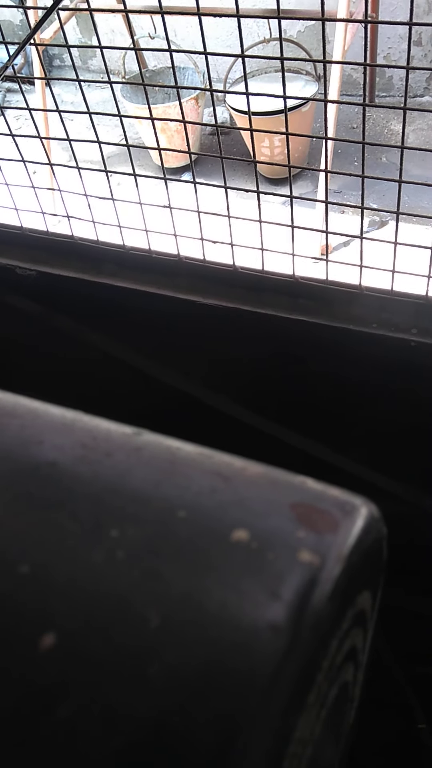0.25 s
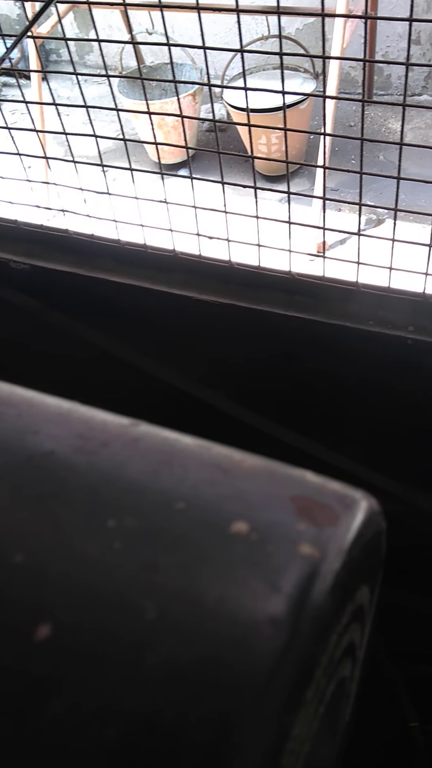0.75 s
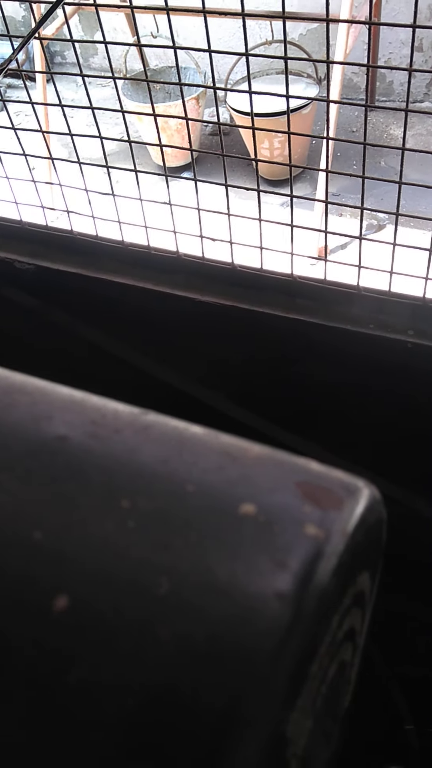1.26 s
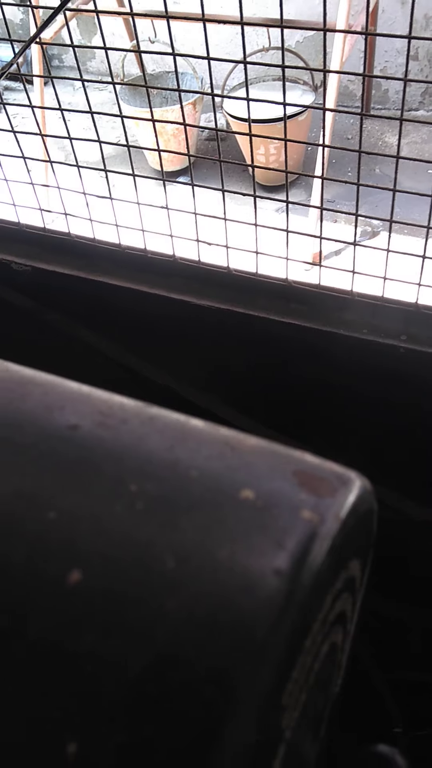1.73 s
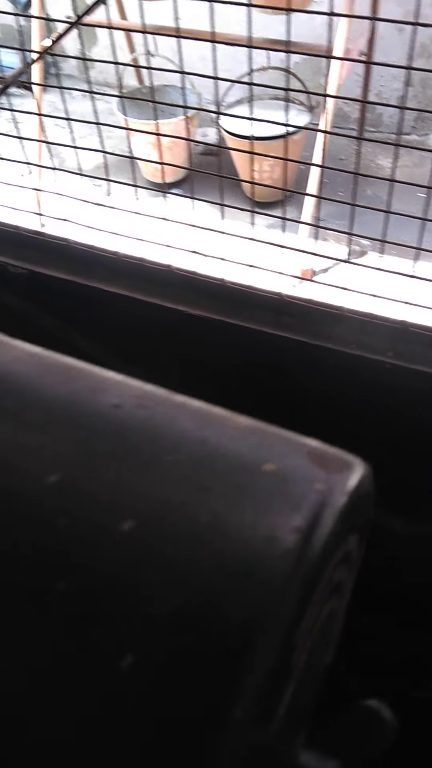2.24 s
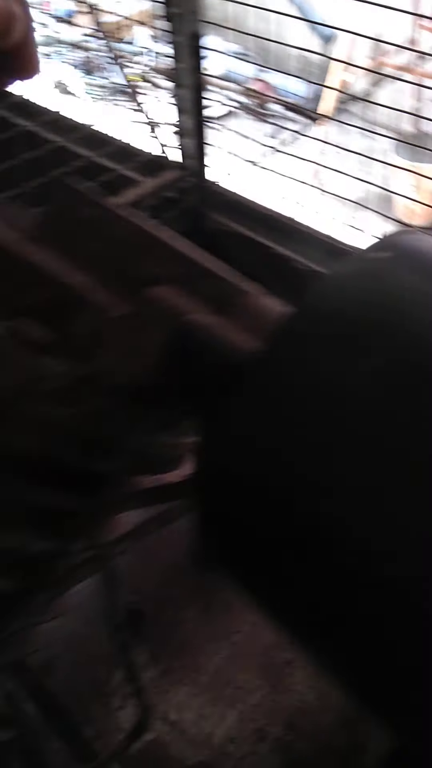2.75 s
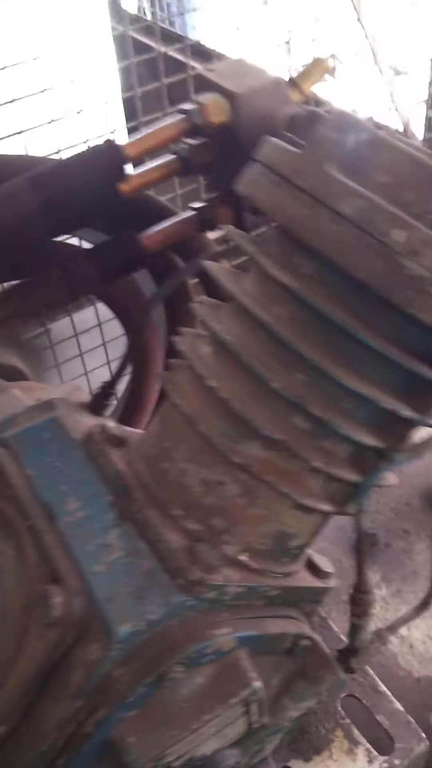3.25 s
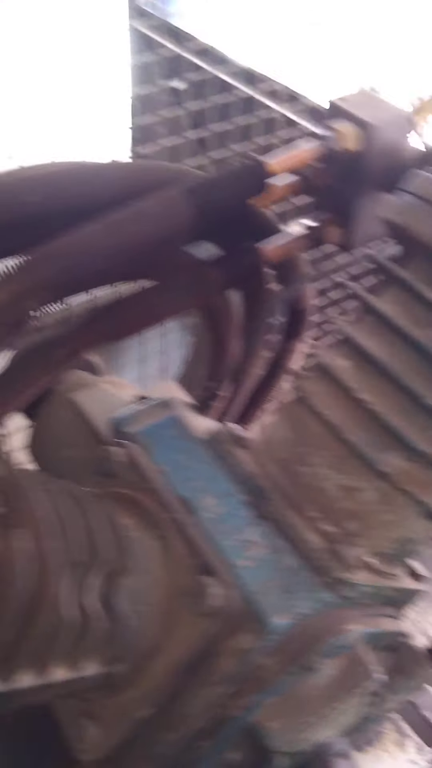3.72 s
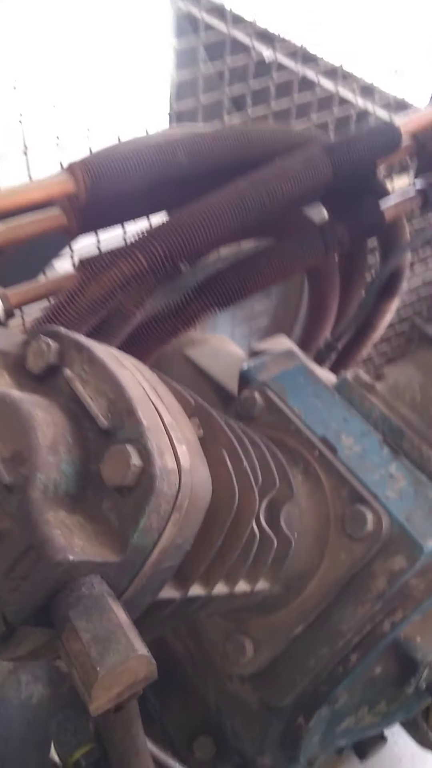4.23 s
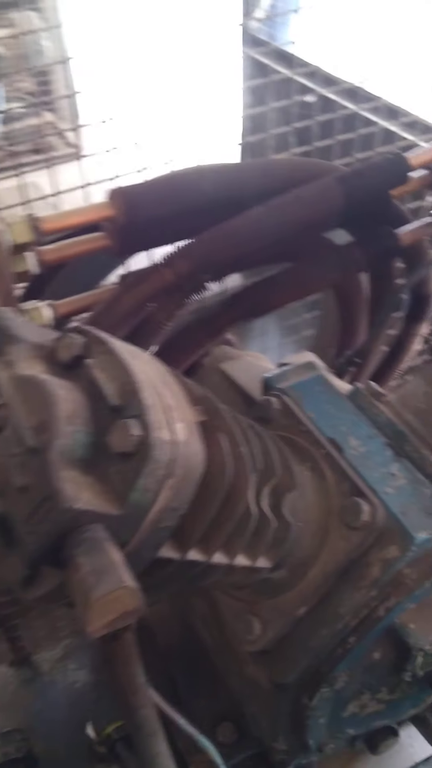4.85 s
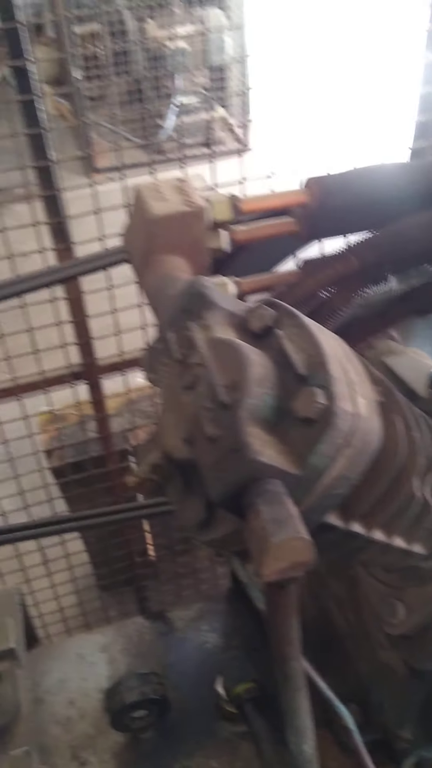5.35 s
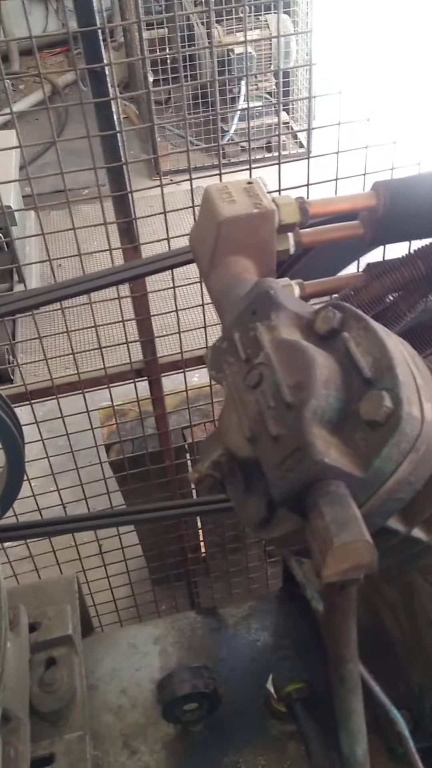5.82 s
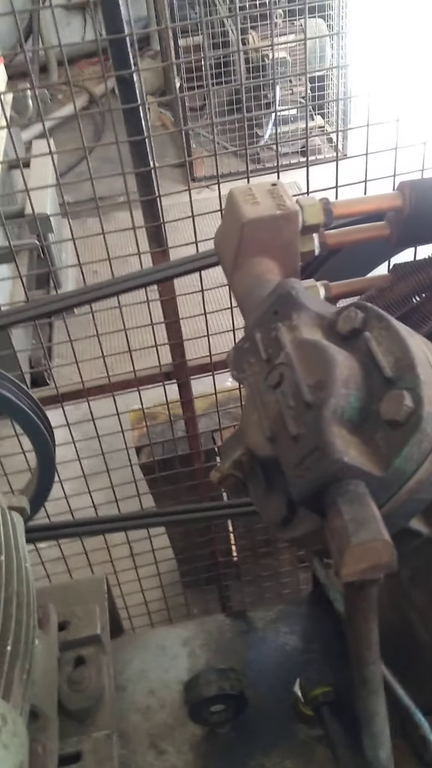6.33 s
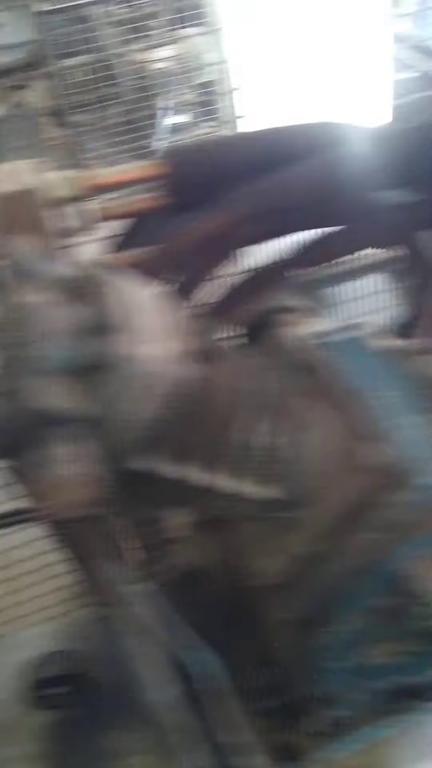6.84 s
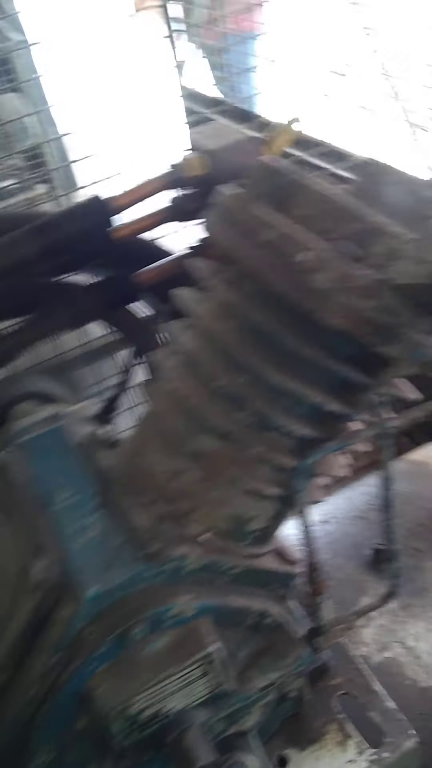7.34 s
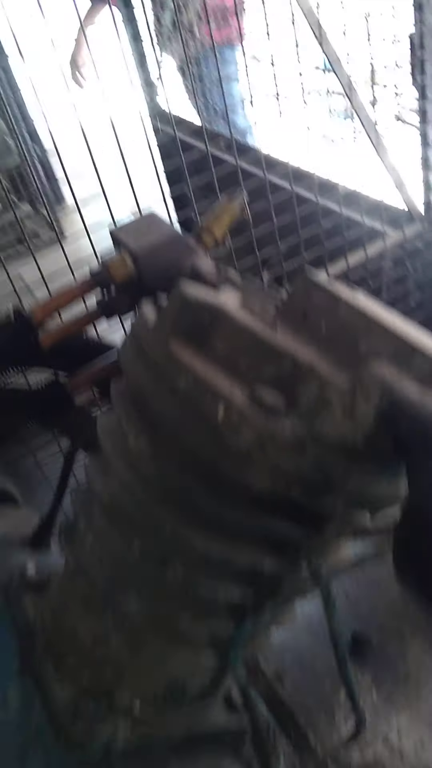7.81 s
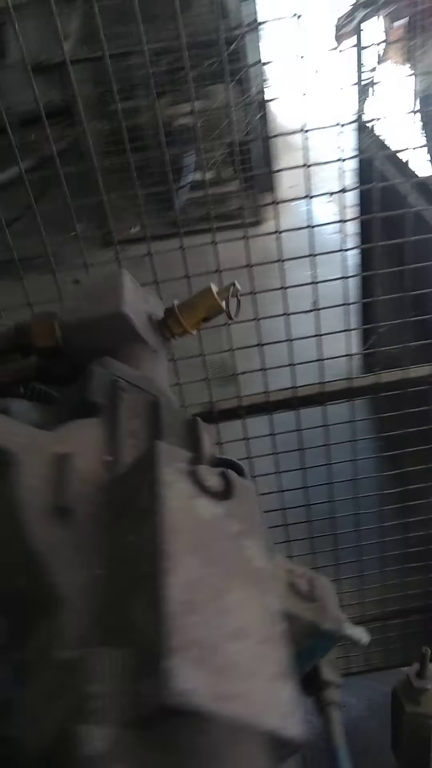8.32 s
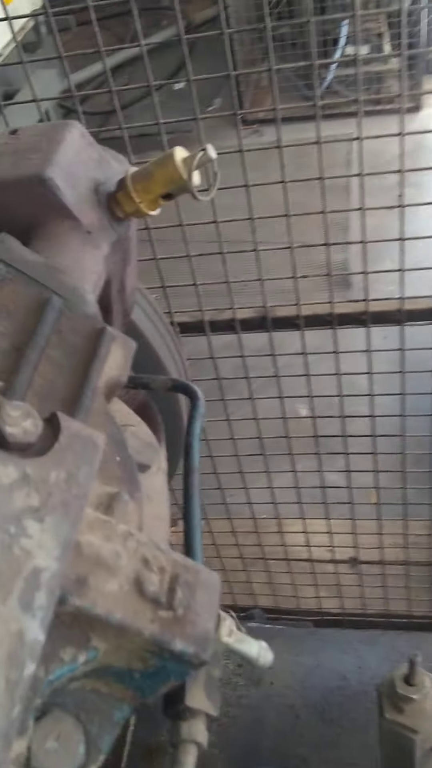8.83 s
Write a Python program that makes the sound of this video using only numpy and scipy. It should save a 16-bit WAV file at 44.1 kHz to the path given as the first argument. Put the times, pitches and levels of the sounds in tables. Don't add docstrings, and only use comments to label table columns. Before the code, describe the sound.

Rapid chugging of a belt-driven air compressor heard close up, hollow pipe knocks and hissing air growing brighter as the microphone moves around it.

```python
import sys
import numpy as np
from scipy import signal
from scipy.io import wavfile

SR = 44100
rng = np.random.default_rng(int(sys.argv[2]) if len(sys.argv) > 2 else 0)


def nominal_scale(level):
    x = np.asarray(level, float) / 20
    return 10 ** x


def transcribe(signal):
    frames = np.atleast_2d(signal).T
    limited = np.clip(frames, -1, 1)
    pcm = np.round(limited * 32767).astype(np.int16)
    wavfile.write(sys.argv[1], SR, pcm)


N = 400428
TURNS_PER_S, FIRST_TURN_S = 15.79, .024

# (t/s after turn start, signed strength)
BLOWS = [
    [(.0102, 1), (.0215, .2), (.0402, .55), (.051, .25)],
    [(.0115, 1), (.023, .5), (.034, -.35), (.042, .55), (.058, .35)],
    [(.0115, 1), (.024, .25), (.031, -.2), (.041, .15), (.052, .2)],
    [(.0115, 1), (.024, .5), (.033, -.2), (.043, .55), (.056, .4)],
    [(.0094, 1), (.019, .12), (.0390, .55), (.049, .2)],
]
# (f/Hz, width/Hz, level/dB, delay t/s)
PUFFS = [
    [(280, 300, 4, 0), (850, 350, -15, .002)],
    [(385, 300, -1.5, 0), (720, 300, -5, .002)],
    [(330, 320, 0, 0), (830, 180, 4, .003)],
    [(310, 300, -1, 0), (760, 400, -5, .002)],
    [(285, 300, 4, 0), (700, 400, -13, .001)],
]
# (f/Hz, width/Hz, level/dB, left minus right level/dB)
MOTOR_PIPES = [(160.3, 2.9, 0.5, -0.5), (183, 9.9, -7.5, -9), (263, 12.5, 10, 2), (418, 2.3, -1.5, 8),
               (474, 3.7, 1.5, 5), (590, 10, -25, 7), (804, 5.9, -15, 34), (784, 1.4, -11, 24),
               (866, 4, -8.5, 34.5)]
CRANKCASE_PIPES = [(164.5, 0.9, -1, 4), (208.4, 13, 6.5, 1.5), (260.8, 2.8, 7.5, 3.5),
                   (308.6, 4.9, 7.5, -5.5), (421, 39, -1, 19), (607, 6.8, -8, -6), (750, 6.7, -57, 26),
                   (788, 17, 1, 13), (896, 3.5, -18, 5)]
HEAD_PIPES = [(158.6, 3.2, 3, -3.5), (204.9, 2.3, 6.5, 4.5), (313, 30, 12, 0), (430, 4.3, 6.5, -5),
              (485, 6.5, -17, 14), (579, 21, 6, 6), (930, 17, -24, -3), (710, 27, -1.5, 8),
              (765.7, 1.6, 10.5, 12), (855, 20, 0.5, 36.5)]
FAR_CASE_PIPES = [(156, 1.03, 1, -1.5), (189.7, 8.4, 6, -2.5), (264.2, 3.5, 8, 1.5), (302, 60, 6.5, -4),
                  (428.5, 8.2, -1, 12), (651, 3.9, 1, 10), (767.5, 5.1, -0.5, -6), (869, 4.8, -8, 25),
                  (1053, 14.6, -10.5, 29.5)]
DOOR_PIPES = [(152, 2.4, 6, 1), (200.6, 12, 5.5, 5.5), (263.6, 13, 10, 2.5), (322, 8.1, -8, -9),
              (363, 28, -37, -7), (450, 6.1, -22, -13), (479, 10, -1.5, -4), (485, 9.4, -24, 2),
              (815, 24, -19, 7)]
PIPES = [MOTOR_PIPES, CRANKCASE_PIPES, HEAD_PIPES, FAR_CASE_PIPES, DOOR_PIPES]
PIPE_RING_DB = [-6.5, -6, -9, -6.5, -8]


def pistons(place, thump_db, knock_db):
    thumps = 0
    for k, (blows, puffs, pipes) in enumerate(zip(BLOWS, PUFFS, PIPES)):
        share = np.clip(1 - abs(place - k), 0, 1) ** 0.56
        clicks = [size * per_turn(s, jitter_s=.00006, spread_db=.6) for s, size in blows]
        puff = intake_puff(sum(clicks), puffs)
        rings = pipe_rings(clicks[0], pipes)
        thumps = thumps + share * rms_one(cage(puff, echo_db=-24) + nominal_scale(PIPE_RING_DB[k]) * rings)
    low = signal.sosfilt(signal.butter(2, 600, fs=SR, output="sos"), thumps)
    knock_gain = nominal_scale(0.76 * (knock_db - thump_db - 14.0))
    return nominal_scale(thump_db + 6.5) * (thumps + (knock_gain - 1) * (thumps - low))


def intake_puff(clicks, puffs):
    puff = 0
    for hz, width, db, late_s in puffs:
        once = resonate(delayed(clicks, late_s), hz, width)
        puff = puff + nominal_scale(db) * rms_one(resonate(once, hz, width))
    return puff


def pipe_rings(clicks, pipes):
    soft = signal.lfilter([1], np.poly([.9, .9]), clicks)
    paths = (rng.uniform(.004, .035, len(pipes)) * SR).astype(int)
    rings = 0
    for path, (hz, width, db, pan_db) in zip(paths, pipes):
        port_gain = nominal_scale(db + pan_db / 2 * np.array([[1], [-1]]))
        rings = rings + port_gain * np.roll(rms_one(resonate(soft, hz, width)), path)
    return rings


# (f/Hz, level/dB per Hz)
RUSH = [(900, 1), (1500, -3), (2300, -2), (3300, -5.5), (4600, -2), (5700, -4), (6600, -4.5), (8300, -13),
        (9500, -8.5), (11500, -18), (12500, -21), (15000, -17.5), (16500, -40)]


def valves(rush_db, ring_db):
    leak = .44 + .07 * (rush_db + 36)
    plate_hiss = .35 * hump(.0585, sharp=30) * nominal_scale(2.5 * drift(12))
    delivery = leak + .8 * hump(.0245, sharp=1.4) + plate_hiss
    rush = rms_one(delivery * port_noise(RUSH, patchy_db=1.3, grit_db=1.0))
    tick = per_turn(.007, jitter_s=.001, spread_db=2)
    rattle = signal.lfilter([1], np.poly([.985, .992]), tick) * rng.standard_normal((2, N))
    ring = rms_one(resonate(resonate(rattle, 11340, 350), 11840, 700))
    return nominal_scale(rush_db) * (nominal_scale(2.5) * rush + nominal_scale(ring_db - 22) * ring * [[.7], [1.1]])


# (f/Hz, level/dB per Hz)
RUMBLE = [(60, 1.5), (120, -22), (200, 3), (300, -3), (450, 0.5), (800, -3.5), (1100, -10.5), (1400, -15),
          (2000, -36), (3000, -15.5), (4000, -51)]


def running_gear(rush_db):
    swell = .8 + .4 * hump(.018, sharp=2.5)
    level = nominal_scale(.8 * (rush_db + 36) - 29.5)
    return level * swell * port_noise(RUMBLE, patchy_db=.6, grit_db=.3)


# (f as multiple of the turn rate, level/dB)
SHAFT_ORDERS = [(4, -37.5), (5, -50), (6, -29.5), (8, -30)]


def shaft(shake_db):
    turn = 2 * np.pi * TURNS_PER_S * np.arange(N) / SR
    tones = sum(nominal_scale(db) * np.sin(order * turn + order ** 2) for order, db in SHAFT_ORDERS)
    return nominal_scale(shake_db) * tones


# (enter t/s, leave t/s, level/dB)
FAN_STREAM = [
    (0, 3.04, -30.5),
    (7.449, 7.85, -30),
]


def fan_wind():
    t = np.arange(N) / SR
    edge_db_per_s, still_air_db = 45, -66
    streams = []
    for enter, leave, db in FAN_STREAM:
        outside_s = np.maximum(0, np.maximum(enter - t, t - leave))
        streams.append(db - edge_db_per_s * outside_s)
    wind_db = np.maximum(np.max(streams, axis=0), still_air_db)
    lumps = nominal_scale(4.5 * np.array([drift(6), drift(6)]))
    band = signal.butter(2, [70, 200], "band", fs=SR, output="sos")
    gust = signal.sosfilt(band, rng.standard_normal((2, N)))
    return nominal_scale(wind_db) * rms_one(lumps * gust) * [[1.1], [.9]]


def cage(x, echo_db):
    lags, signs = rng.uniform(0.00394, 0.059, (2, 14)), rng.choice([-1, 1], (2, 14))
    taps = np.zeros((2, int(.06 * SR)))
    for port in range(2):
        at = (lags[port] * SR).astype(int)
        taps[port, at] = signs[port] * nominal_scale(echo_db - 200 * lags[port])
    taps[:, 0] = 1
    return np.array([signal.fftconvolve(x, tap)[:N] for tap in taps])


# (f/Hz, share alike)
PORT_LIKENESS = [(60, 0.96), (300, 0.71), (900, 0.09), (1600, 0.043), (3000, 0.061), (15000, 0.067)]


def port_noise(spectrum, patchy_db, grit_db):
    out, edges = 0, 50 * 2 ** np.arange(0, 8.6, 1 / 3)
    grit = nominal_scale(grit_db * np.minimum(rng.exponential(1, N), 5))
    white = rng.standard_normal((2, 2, N)) * grit
    for k, (low, high) in enumerate(zip(edges, edges[1:])):
        hz = np.sqrt(low * high)
        level_db = at_hz(spectrum, hz)
        if level_db > -36:
            band = signal.butter(2, [low, high], "band", fs=SR, output="sos")
            mid, side = signal.sosfilt(band, white[k % 2])
            alike = np.clip(at_hz(PORT_LIKENESS, hz), 0, 1)
            ports = np.sqrt(1 + alike) * mid + np.sqrt(1 - alike) * side * [[1], [-1]]
            out = out + nominal_scale(level_db + patchy_db * drift(18.0)) * ports
    return rms_one(out)


def per_turn(after_s, jitter_s, spread_db):
    chance = rng.standard_normal((145, 2))
    turn_s = FIRST_TURN_S + np.arange(-1, 144) / TURNS_PER_S
    at = (turn_s + after_s + jitter_s * chance[:, 0]) * SR
    inside = (at >= 0) & (at < N)
    clicks = np.zeros(N) + 1e-18
    clicks[at[inside].astype(int)] = nominal_scale(spread_db * chance[inside, 1])
    return clicks


def hump(centre_s, sharp):
    since_s = np.arange(N) / SR - FIRST_TURN_S - centre_s
    return np.exp(sharp * (np.cos(2 * np.pi * TURNS_PER_S * since_s) - 1))


def resonate(x, hz, width):
    r = np.exp(-np.pi * width / SR)
    poles = [1, -2 * r * np.cos(2 * np.pi * hz / SR), r * r]
    return signal.lfilter(np.array([1, 0, -1]) * (1 - r * r) / 2, poles, x)


def delayed(x, lag_s):
    return np.interp(np.arange(N) - lag_s * SR, np.arange(N), x)


def drift(rate):
    r = np.exp(-80 * np.pi * rate / SR)
    noise = rng.standard_normal(N // 40 + 2002)
    slow = signal.lfilter([1], [1, -2 * r, r * r], noise)[2000:]
    return np.interp(np.arange(N) / 40, np.arange(len(slow)), rms_one(slow))


def rms_one(x):
    return x / np.sqrt(np.mean(x ** 2) + 1e-20)


def at_hz(points, hz):
    table_hz, values = np.transpose(points)
    return np.interp(np.log(hz), np.log(table_hz), values)


def in_time(rows):
    s, *columns = np.transpose(rows)
    return [np.interp(np.arange(N) / SR, s, c) for c in columns]


# (t/s, place 0 motor 1 crankcase 2 head 3 crankcase again 4 cage door,
# distance to the valves/m, left port lead/ms)
WALK = [(0, 0.02, 1.35, 0.022), (1.2, 0.037, 1.42, 0.023), (2.3, 0.033, 1.37, 0.021),
        (2.7, 0.067, 1.2, .02), (3.3, 0.88, 0.96, 0.016), (3.9, 1.48, 0.89, 0.1), (4.5, 2.47, 0.87, 0.081),
        (5.5, 2.4, 0.89, 0.11), (6.5, 2.42, 0.88, 0.081), (7.0, 2.88, 0.86, 0.049),
        (7.5, 3.18, 0.86, 0.051), (8.0, 3.19, 0.99, 0.084), (8.4, 3.77, 1.2, 0.112), (9.08, 4.4, 1.36, 0.2)]
# (thump level/dB, frame shake level/dB, valve plate ring level/dB)
PLACES = [
    (-21, 1.5, 7),
    (-23, -1, 9.5),
    (-18, -6.2, 11),
    (-21, -3, 6),
    (-22.5, 3, 4),
]


def scene():
    place, metres, lead_ms = in_time(WALK)
    thump_db, shake_db, ring_db = [np.interp(place, np.arange(len(PLACES)), c) for c in np.transpose(PLACES)]
    loss_db = 20 * np.log10(metres)
    rush_at_1m_db, knock_at_1m_db, knock_ceiling_db = -30, -15, -14
    knock_shade, ring_shade = 1.53, 1
    rush_db = rush_at_1m_db - loss_db
    knock_db = np.minimum(knock_at_1m_db - knock_shade * loss_db, knock_ceiling_db)
    machine = pistons(place, thump_db, knock_db) + valves(rush_db, ring_db - ring_shade * loss_db)
    left, right = machine + running_gear(rush_db) + shaft(shake_db)
    return np.array([left, delayed(right, lead_ms / 1000)]) + fan_wind()


def top_cut(x):
    return signal.sosfilt(signal.butter(12, 15670, fs=SR, output="sos"), x)


def record(dry):
    ports = np.array([signal.lfilter([.62], [1, -.38], dry[0]), dry[1]])
    late_and_dull = np.r_[np.zeros(8), signal.firwin(24, 4900, fs=SR)]
    other_port = signal.lfilter(late_and_dull, 1, ports[::-1])
    aimed = (ports - 0.83 * other_port) * nominal_scale([[.1], [-.1]])
    aimed = signal.sosfilt(signal.butter(2, 45, "high", fs=SR, output="sos"), aimed)
    aimed = signal.sosfilt(signal.cheby2(12, 60, 15700, fs=SR, output="sos"), aimed)
    return top_cut(aimed)


dry = scene()
out = record(dry)
transcribe(out)
```